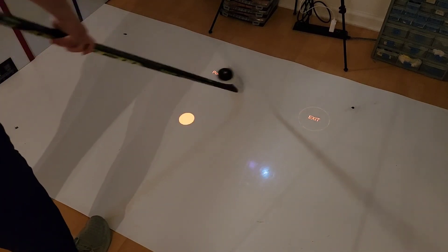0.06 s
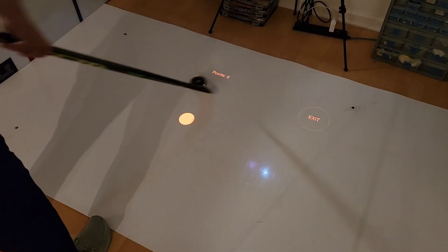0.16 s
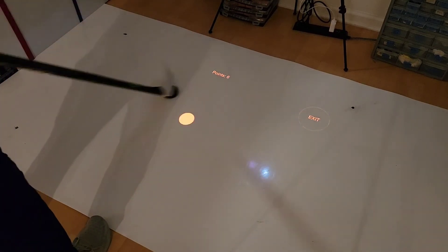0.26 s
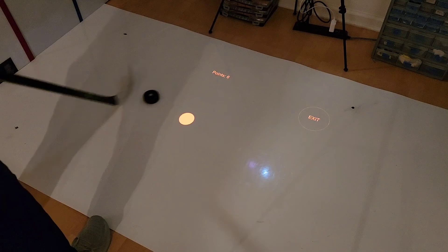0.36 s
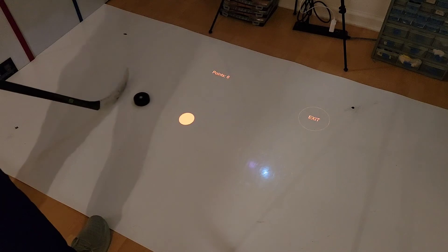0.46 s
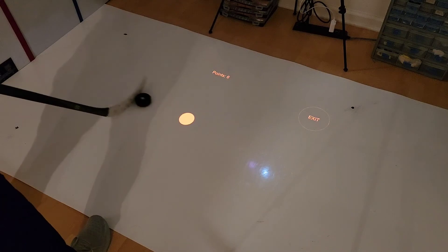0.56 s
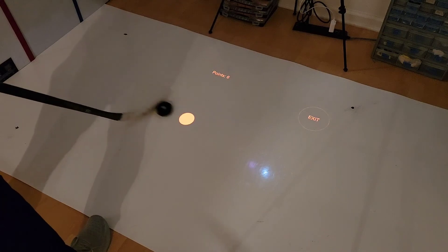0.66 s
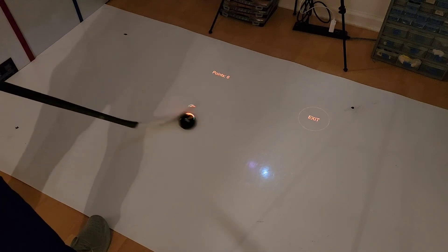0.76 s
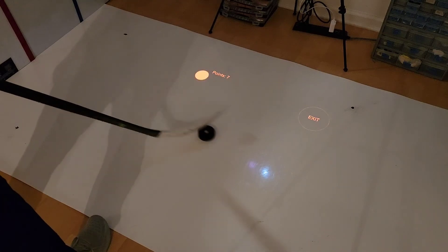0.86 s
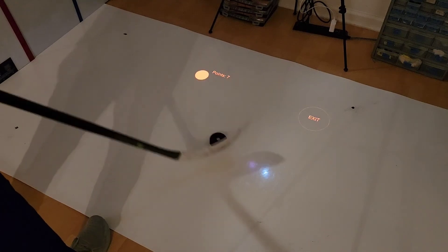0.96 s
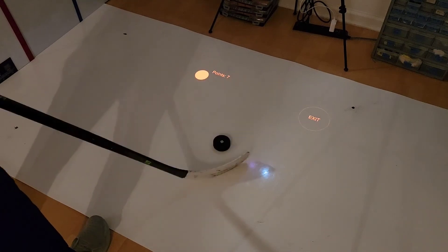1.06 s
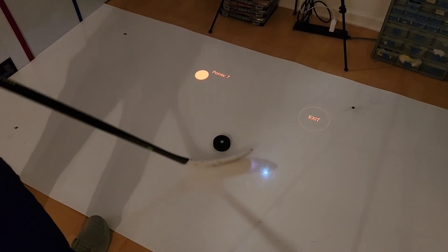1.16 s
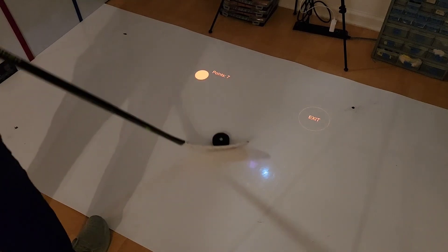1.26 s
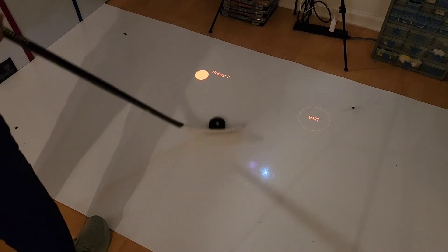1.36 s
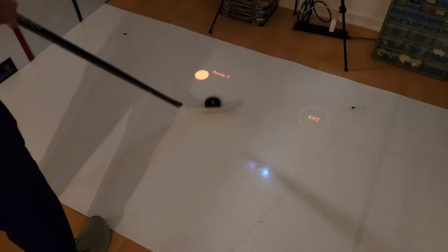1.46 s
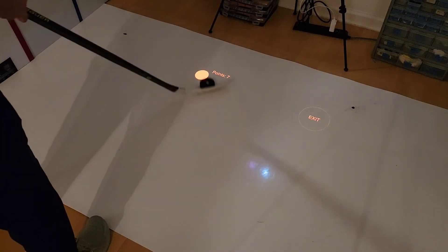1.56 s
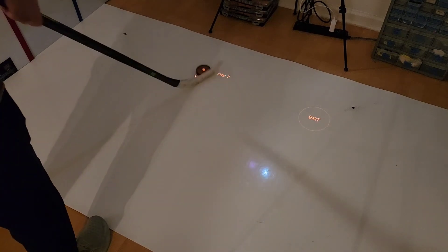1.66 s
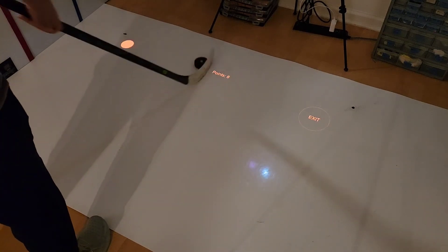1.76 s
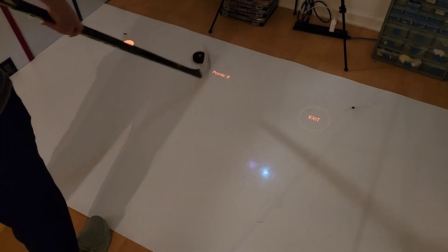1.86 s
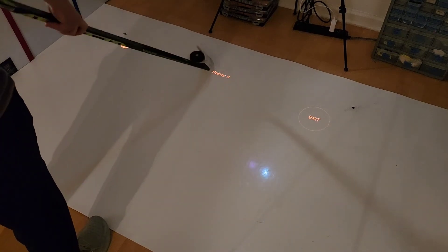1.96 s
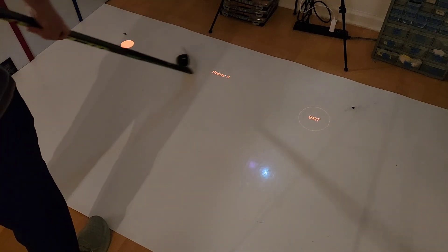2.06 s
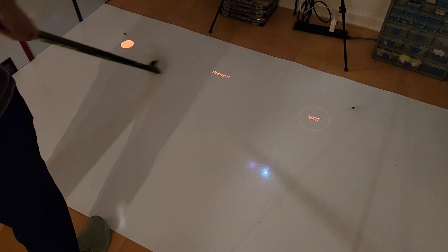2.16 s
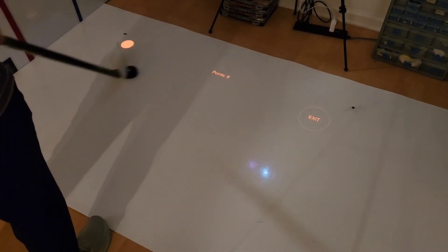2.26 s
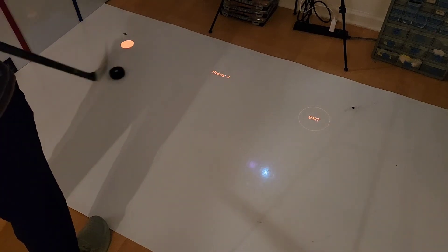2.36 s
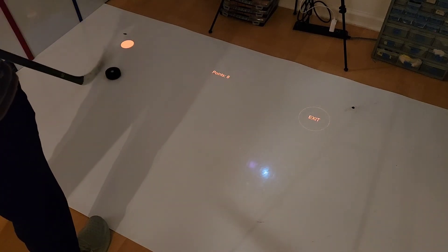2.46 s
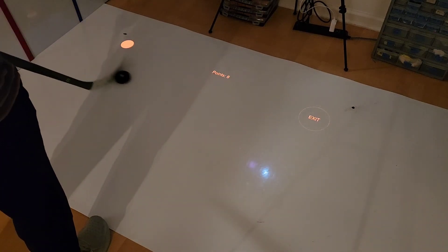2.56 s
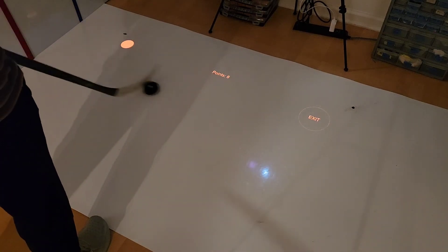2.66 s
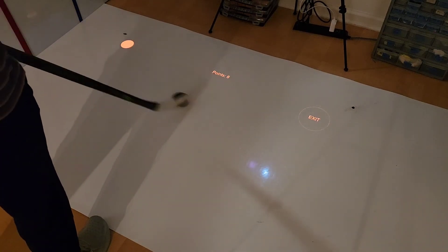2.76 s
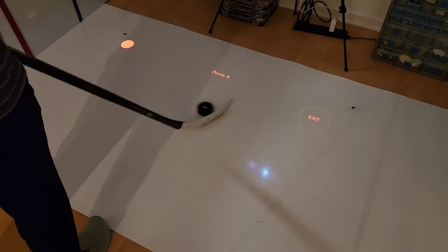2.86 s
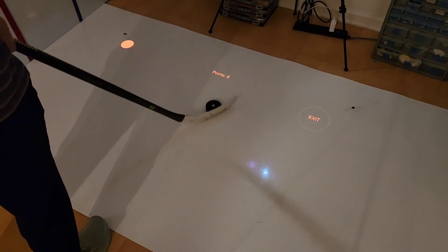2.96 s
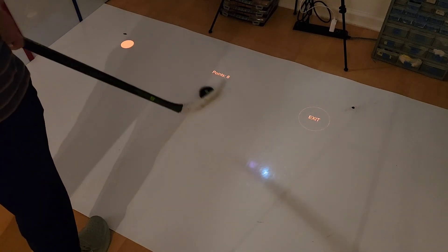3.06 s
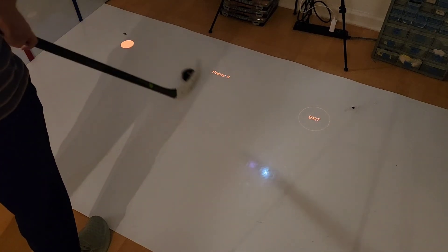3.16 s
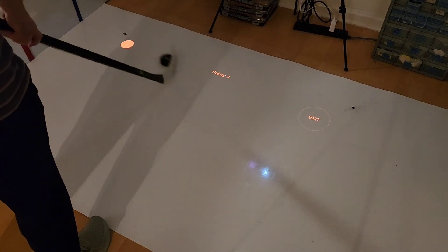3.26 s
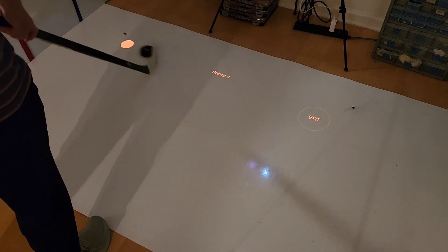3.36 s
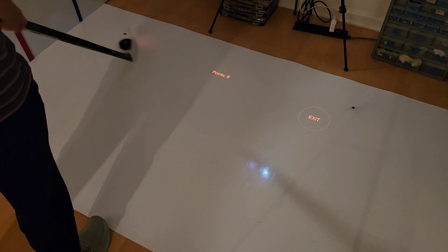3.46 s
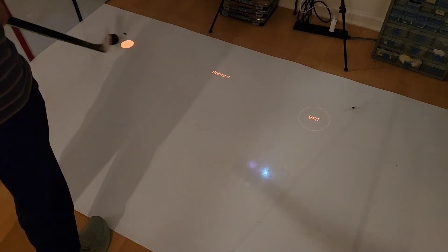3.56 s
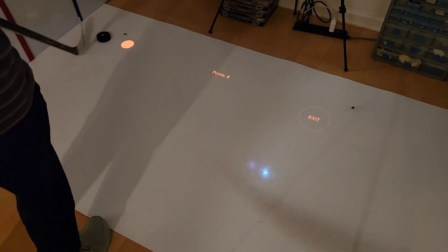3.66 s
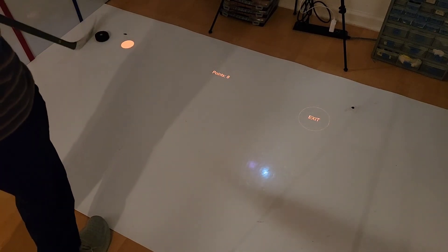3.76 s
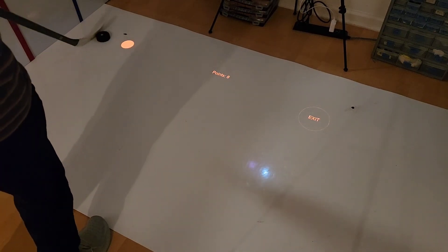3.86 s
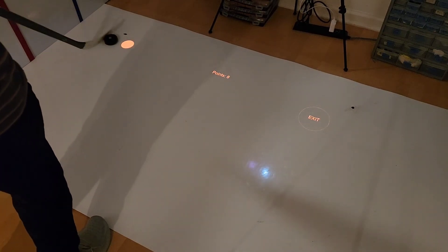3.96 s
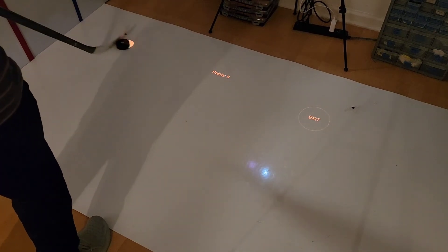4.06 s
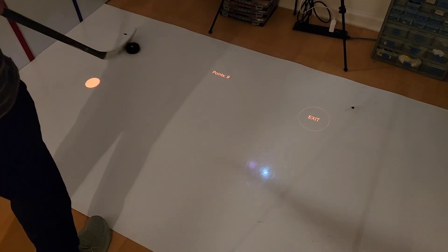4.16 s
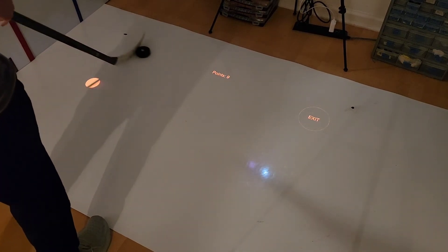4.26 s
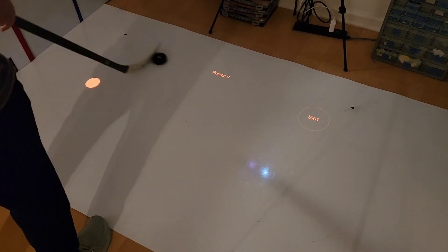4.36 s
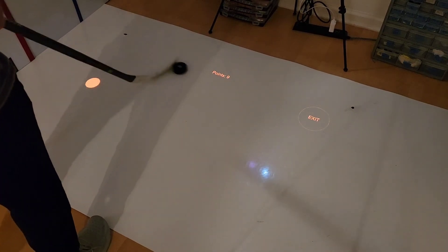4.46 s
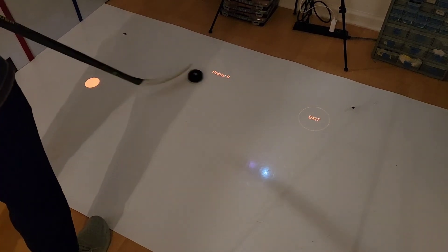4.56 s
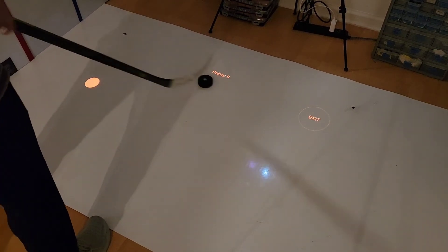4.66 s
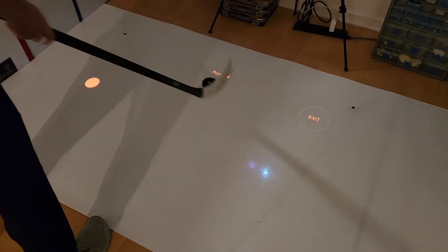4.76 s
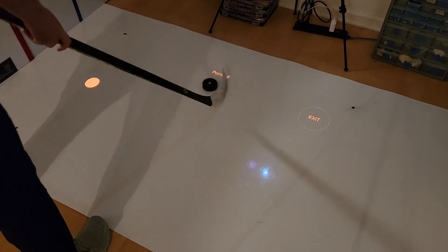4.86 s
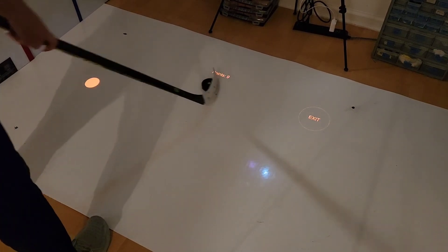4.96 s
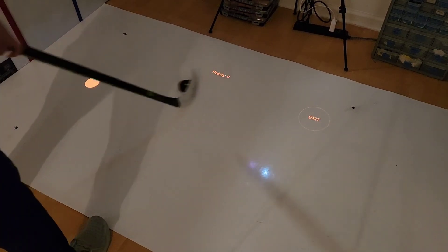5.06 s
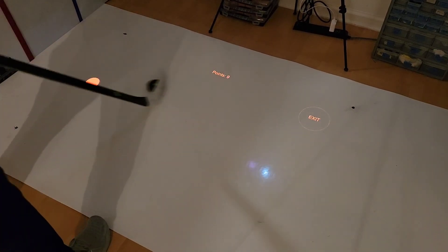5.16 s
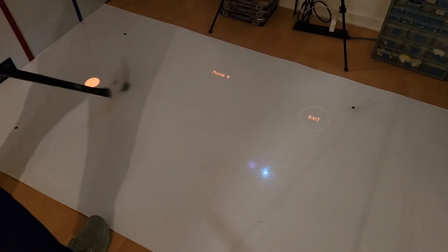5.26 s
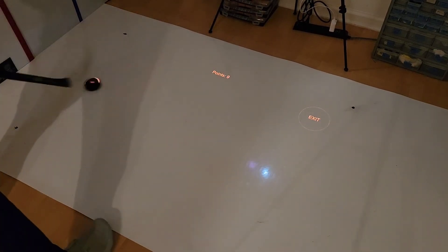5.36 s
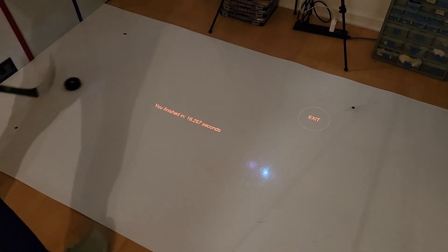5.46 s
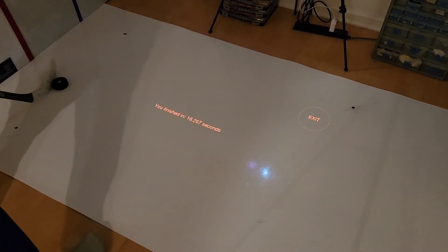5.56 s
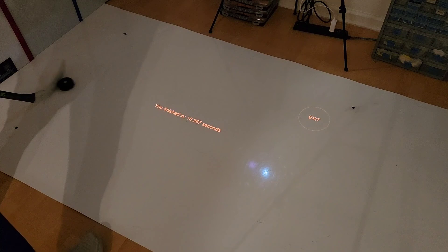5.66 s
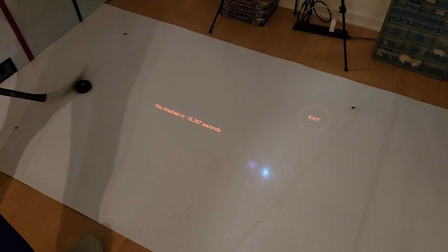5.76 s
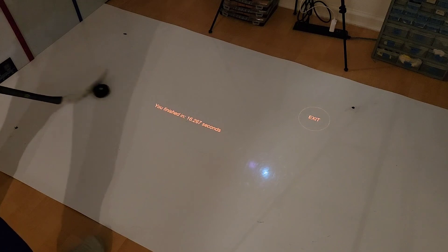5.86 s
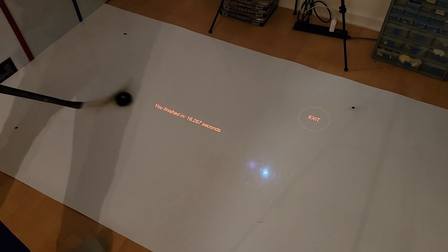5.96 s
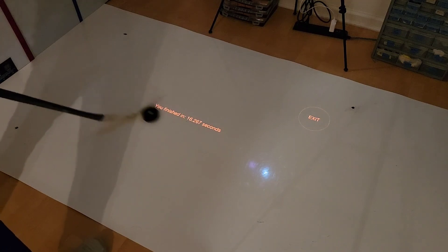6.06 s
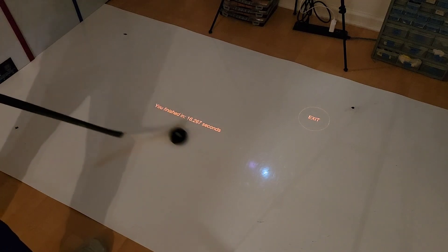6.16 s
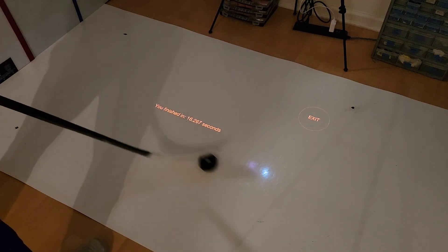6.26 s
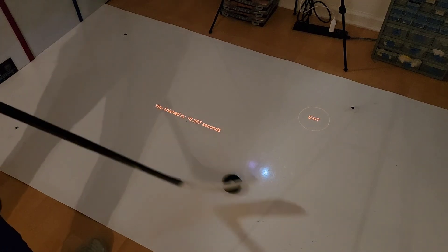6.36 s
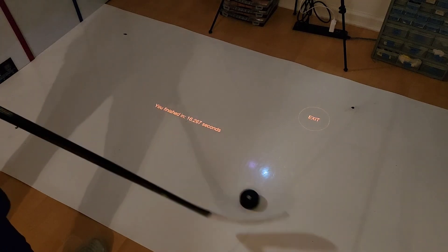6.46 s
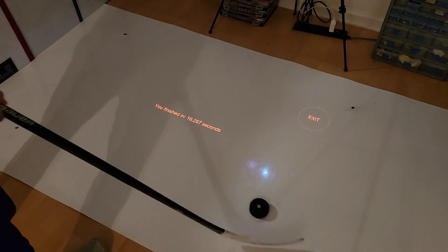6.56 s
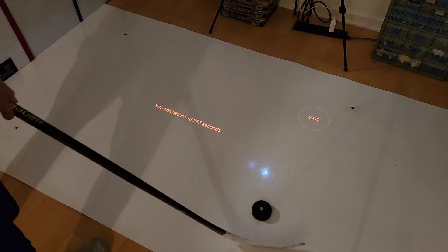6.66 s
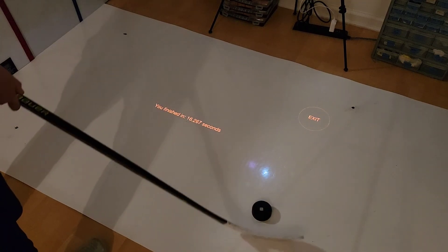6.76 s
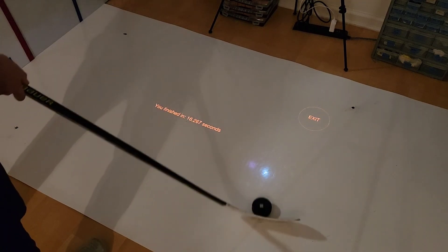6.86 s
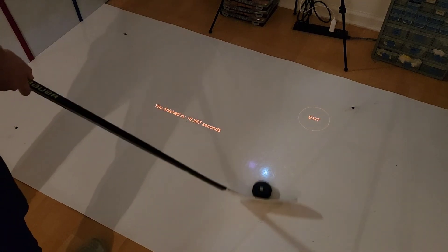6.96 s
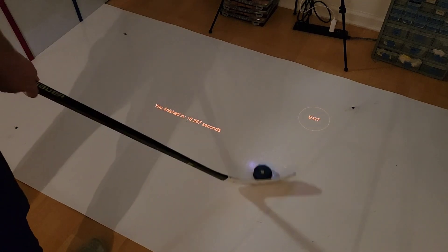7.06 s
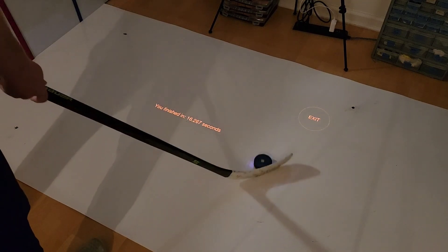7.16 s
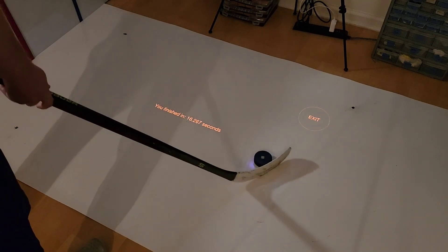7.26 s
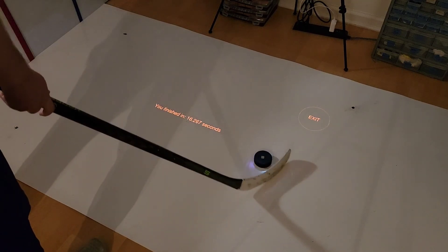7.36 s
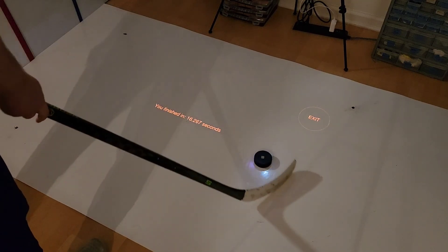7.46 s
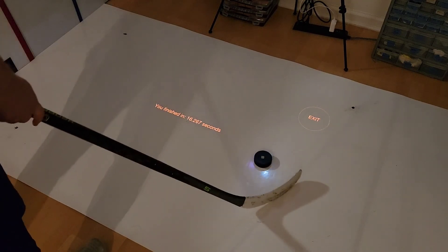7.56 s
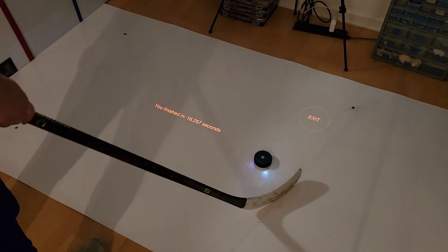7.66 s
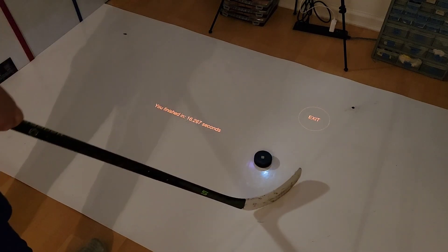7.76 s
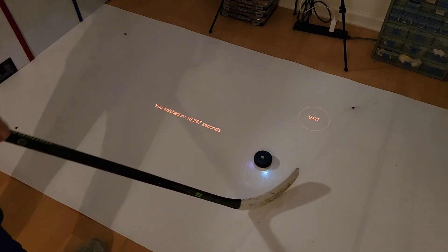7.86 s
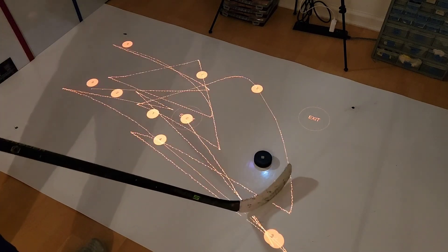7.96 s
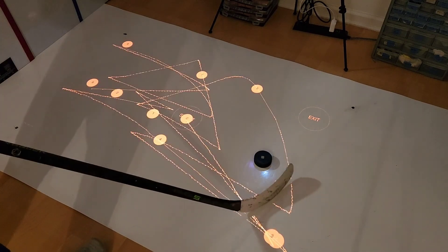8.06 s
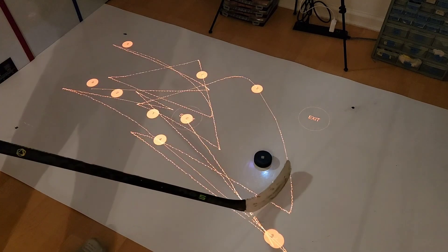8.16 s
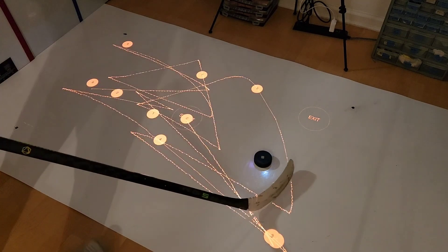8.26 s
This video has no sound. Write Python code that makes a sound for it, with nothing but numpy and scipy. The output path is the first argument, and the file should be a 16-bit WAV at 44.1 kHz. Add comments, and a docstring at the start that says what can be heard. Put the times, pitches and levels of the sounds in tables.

```python
"""Stick and puck on a slick floor

A stick blade knocks a plastic puck about on a slick floor sheet in a small hard room. Each blow is a filtered
pulse, a short knock and crack, that random room echoes draw out. Blade and puck hiss as they slide and
ventilation rumbles underneath: coloured noise, with sine fan tones. Soles or blade chirp now and then
(noise bursts through a resonance), and the floor booms (a dying low sine with a dull thump)."""
import sys
import numpy as np
from scipy import signal
from scipy.fft import rfft, irfft, next_fast_len
from scipy.io import wavfile

SR = 44100
rng = np.random.default_rng(int(sys.argv[2]) if len(sys.argv) > 2 else 0)


def makeup_ratio(level_db):
    """Linear amplitude ratio for a level in decibels (20 dB per factor of ten)."""
    decades = np.asarray(level_db, float) / 20
    return 10 ** decades


def store_pcm(level_fs):
    """Save levels as 16-bit WAV."""
    pcm = np.round(np.clip(level_fs, -1, 1) * 32767).astype(np.int16)
    wavfile.write(sys.argv[1], SR, np.atleast_2d(pcm).T)


N = 366912
TAIL = 2 ** 15   # samples in one event with its room tail


def rms_one(x):
    """Scale to unit rms."""
    return x / np.sqrt(np.mean(x ** 2) + 1e-20)


def peak_one(x):
    """Scale to unit peak."""
    return x / abs(x).max()


def at_hz(points, hz):
    """Read a spectrum table on a log-frequency axis."""
    table_hz, table_value = np.transpose(points)
    return np.interp(np.log(np.maximum(hz, 1)), np.log(table_hz), table_value)


def drift(rate_hz):
    """Slow chance: unit-spread random knots, rate_hz a second, joined by straight lines."""
    knots = rng.standard_normal(int(N / SR * 60) + 2)
    return np.interp(np.arange(N) / SR * min(rate_hz, 59), np.arange(len(knots)), knots)


def stereo(mid, side, hz):
    """Diffuse sound: the two microphones agree in the bass and part in the treble."""
    # left-right correlation: (frequency [Hz], likeness [-1..1])
    likeness = [(60, 0.95), (180, 0.95), (550, 0.58), (1650, -0.13), (4970, 0.14), (15000, -0.11)]
    alike = np.clip(at_hz(likeness, hz), -1, 1)
    return (np.sqrt(1 + alike) * mid + np.sqrt(1 - alike) * side * [[1], [-1]]) / np.sqrt(2)


def noise(spectrum, patchy_db, rate_hz):
    """Diffuse coloured noise, its two-octave-spaced bands flickering partly on their own; rms 1."""
    size = next_fast_len(N)
    hz = np.arange(size // 2 + 1) * SR / size
    whole = stereo(*rfft(rng.standard_normal((2, size))), hz) * makeup_ratio(at_hz(spectrum, hz))
    octave = np.log2(np.maximum(hz, 1) / 25)
    together = drift(rate_hz)
    out = 0
    for k in range(0, 11, 2):
        share = np.clip(1 - abs(octave - k) / 2, 0, 1)
        band = irfft(whole * share, size)[:, :N]
        out = out + band * makeup_ratio(patchy_db * (0.14 * together + drift(rate_hz)))
    return rms_one(out)


def resonance(hz, centre_hz, width_hz):
    """Power of a mode, 1 on top."""
    return 1 / (1 + ((hz ** 2 - centre_hz ** 2) / (hz * width_hz + 1e-9)) ** 2)


def sudden(power):
    """The most sudden pulse that has this power spectrum (minimum phase); peak 1."""
    fold = irfft(np.log(power + 1e-12) / 2)
    fold[1:TAIL // 2] *= 2
    fold[TAIL // 2 + 1:] = 0
    return peak_one(irfft(np.exp(rfft(fold))))


def spread(x, hz, width_hz):
    """Bending waves in the blade arrive smeared over a millisecond or two: an all-pass."""
    r, w = np.exp(-np.pi * width_hz / SR), 2 * np.pi * hz / SR
    return signal.lfilter([r * r, -2 * r * np.cos(w), 1], [1, -2 * r * np.cos(w), r * r], x)


def room(dry):
    """Fresh reflections for each source spot: lone early echoes thicken to a tail that dies band by band."""
    # reverberation time: (band centre [Hz], t60 [s])
    room_t60 = [(100, 0.64), (200, 0.39), (400, 0.39), (800, 0.43), (1600, 0.57), (3200, 0.52), (6400, 0.6),
                (12800, 0.43)]
    # colour of the room's answer: (frequency [Hz], level [dB])
    room_colour = [(100, 8), (300, 1.5), (700, 4), (1700, 5.5), (3500, 3.5), (7000, 2.5), (14000, -8)]
    grain, grain_decay_s, first_s, build_s = 0.64, 0.072, 0.00021, 0.0038
    bass_build_cycles = 0.76   # time constant of a band's swell, in cycles of its centre
    t, hz = np.arange(TAIL) / SR, np.arange(TAIL + 1) * SR / (2 * TAIL)
    sizes = np.exp(grain * np.exp(-t / grain_decay_s) * rng.standard_normal((2, TAIL)))
    build = 1 - np.exp(-np.maximum(t - first_s, 0) / build_s)
    echoes = rng.standard_normal((2, TAIL)) * sizes * build
    echoes *= 1 + 0.75 * np.exp(-t / 0.02)   # the nearest walls answer loudest
    centres = np.log(np.array(room_t60)[:, 0])
    reply = 0
    for k, (centre_hz, t60_s) in enumerate(room_t60):
        share = np.interp(np.log(hz + 1), centres, np.arange(len(centres)) == k)
        swell = 1 - np.exp(-t * centre_hz / bass_build_cycles)
        band = rfft(echoes * swell * makeup_ratio(-60 * t / t60_s), 2 * TAIL)
        reply = reply + share * band / np.sqrt(t60_s * SR / 14)   # even energy for any t60
    reply = stereo(*reply, hz) * makeup_ratio(at_hz(room_colour, hz))
    return irfft(rfft(dry, 2 * TAIL) * reply)[:, :TAIL]


def add(out, s, sound):
    """Mix a sound in at time s [s]."""
    i = round(s * SR)
    out[:, i:i + TAIL] += sound[..., :N - i]


def background():
    """Sliding hiss follows the strokes; rumble, air and fan tones run throughout."""
    # sliding strokes: (time [s], hiss level [dB rms], sizzle over hiss [dB])
    slide = [(0, -68.5, -19), (.12, -67.5, 3), (.7, -64.5, -6), (1.0, -75, 2), (1.6, -60, 1),
             (2.02, -69, -10.5), (2.2, -61, -5), (3.25, -61.5, -0.5), (3.92, -72.5, -5.5),
             (4.03, -57.5, -3.5), (4.22, -66.5, -5.5), (4.52, -58.5, -1), (4.75, -70.5, -7.5),
             (5.15, -62, -1.5), (5.7, -73, 7.5), (6.3, -63.5, 1.5), (6.7, -71, -6.5), (7.55, -62.5, -3),
             (7.72, -74.5, -5), (8.32, -73.5, -8)]
    # sliding hiss spectrum: (frequency [Hz], relative level [dB per Hz])
    hiss_colour = [(1000, -37.5), (1800, -11.5), (3000, -6), (5000, -4.5), (8500, -10.5)]
    # treble of the sliding: (frequency [Hz], relative level [dB per Hz])
    sizzle_colour = [(7000, -5), (9500, -8.5), (16000, -16)]
    # ventilation rumble spectrum: (frequency [Hz], relative level [dB per Hz])
    rumble_colour = [(20, -18.5), (38, 7.5), (54, 11.5), (70, 7.5), (97, 8.5), (129, -15.5), (150, -56.5),
                     (330, -120)]
    # rumble level: (time [s], level [dB rms])
    rumble_level = [(0, -50.5), (.45, -50), (1.4, -54), (3.3, -57.5), (8.32, -53.5)]
    # steady air spectrum: (frequency [Hz], relative level [dB per Hz])
    air_colour = [(76, -63), (130, -10.5), (268, -10), (410, -14), (829, -16.5), (16000, -57.5)]
    # fan tones: (frequency [Hz], mid level [dB rms])
    fan_tones = [(118.4, -66), (414.5, -73.5)]
    air_db = -58.5
    t = np.arange(N) / SR
    s, hiss_db, bright_db = np.transpose(slide)
    shut = [(17000, -60)]
    hiss = noise(hiss_colour + [(10000, -30)] + shut, patchy_db=1.6, rate_hz=9.0)
    sizzle = noise([(4000, -80.0)] + sizzle_colour + shut, patchy_db=-4.5, rate_hz=12.0)
    sizzle = makeup_ratio(np.interp(t, s, bright_db)) * sizzle
    sliding = makeup_ratio(np.interp(t, s, hiss_db)) * (hiss + sizzle)
    rumble = noise(rumble_colour, patchy_db=-6.0, rate_hz=6.7)
    rumble = makeup_ratio(np.interp(t, *np.transpose(rumble_level))) * rumble
    hum = 0
    for hz, db in fan_tones:
        hum = hum + makeup_ratio(db + 3.7 * drift(4.5)) * np.sqrt(2) * np.sin(2 * np.pi * hz * t)
    air = makeup_ratio(air_db) * noise(air_colour, patchy_db=2.0, rate_hz=25.0)
    return sliding + rumble + hum + air


def blows():
    """A broad knock with a woody core, a hard crack, and the modes with new strengths each time."""
    # (time [s], direct peak [dB], knock pitch [Hz], blade ring [dB], crack before trim [dB],
    #  crack brightness [dB per octave], room [dB])
    blow_table = [(0.4557, -9, 682, -1.5, -12.5, -4.5, 1), (0.459, -9, 1150, -1, 1, -4, -3),
                  (0.61, -6, 728, 7.5, -4.5, 3, -2), (1.1319, -9.5, 535, 12, -6, -1.5, -5),
                  (1.312, -11, 620, 9, -10.5, -0.6, -2.5), (2.337, -30.5, 486, -6.5, -16, -3, -0.5),
                  (2.44, -35, 478, -4, -20, -5, 4), (2.471, -16, 575, -3.5, -18.5, -3, -0.5),
                  (2.5758, -12.5, 602, 8.5, -14, 3, -1.5), (2.924, -8, 950, 7, -8.5, 3.5, -5),
                  (2.9661, -6.5, 924, 5, -4.5, 1.5, -2), (3.743, -9, 630, 7, -9, -1, 0.5),
                  (4.9343, -1.5, 612, -1, -3.5, -0.5, 0.5), (5.033, -24.5, 616, 7, -34, -6, 3),
                  (5.566, -18.5, 600, 1.5, -13.5, -0.5, 0.5), (5.63, -15.5, 555, 4, -14.5, 1, -3),
                  (6.722, -24.5, 1225, 2, -47, -7, -9), (6.906, -16, 802, 2, -13, 0, -0.5)]
    # blade and sheet modes: (frequency [Hz], mean level [dB], ring [s], where width [Hz] = 3.03 / ring)
    blade_modes = [(216.4, -1.5, 0.051), (333.5, -4, 0.15), (434, -4, 0.012), (650, -1, 0.28),
                   (973, -7.5, 0.012)]
    # upper modes of blade and puck, struck by the crack: (frequency [Hz], width [Hz])
    upper_modes = [(1160, 150), (1340, 44), (1780, 13), (2220, 360), (2720, 23), (3400, 430), (4700, 100)]
    # hard edge of a contact: (frequency [Hz], level [dB])
    crack_colour = [(650, -18), (1150, 3.5), (2000, 1.5), (4000, 3.5), (5500, 0.5), (8000, -3),
                    (14000, -11.5)]
    # straight path against room sound: (frequency [Hz], level [dB])
    toward_microphone = [(130, -23.5), (300, 2.5), (1300, 11), (2500, 9), (4800, 12.5), (7000, 2.5),
                         (12000, -13.5)]
    lead_s, lag_s, second_s = 0.0004, 0.00011, 0.0009
    contact_cut = 2.07   # a contact stirs the modes up to this multiple of its knock pitch
    # the crack steps down above a pitch that sinks for softer blows
    edge_hz, edge_db_per_octave, edge_step_db = 4300, 18, -8
    crack_trim_db = -6.5
    out, t = np.zeros((2, N)), np.arange(TAIL) / SR
    hz = np.arange(TAIL // 2 + 1) * SR / TAIL
    for s, peak_db, knock_hz, ring_db, crack_db, bright_db, room_db in blow_table:
        knock = resonance(hz, knock_hz, 1.37 * knock_hz) ** 6.6
        core = makeup_ratio(11.5) * resonance(hz, 1.049 * knock_hz, 0.085 * knock_hz) ** 2.2

        modes = 0
        for mode_hz, db, ring_s in blade_modes:
            modes = modes + makeup_ratio(db + rng.normal(0, 2.7)) ** 2 * resonance(hz, mode_hz, 3.03 / ring_s)
        modes = modes / (1 + (hz / (contact_cut * knock_hz)) ** 4)

        ringing = 1
        for mode_hz, width_hz in upper_modes:
            ringing = ringing + makeup_ratio(rng.normal(1, 3)) ** 2 * resonance(hz, mode_hz, width_hz)
        edge_db = at_hz(crack_colour, hz) + bright_db * np.log2(np.maximum(hz, 1000) / 3000)
        step_hz = edge_hz * 2 ** (peak_db / edge_db_per_octave)
        below = 1 / (1 + (hz / step_hz) ** 12)
        edge_db = edge_db + edge_step_db * (1 - below)
        crack = ringing * makeup_ratio(crack_db + crack_trim_db + edge_db) ** 2

        power = knock + core + makeup_ratio(ring_db) ** 2 * modes + crack
        near = sudden(power * makeup_ratio(at_hz(toward_microphone, hz)) ** 2)
        near = spread(spread(near, 2660, 1200), 2200, 1192)
        # a light touch of opposite sign, then the full blow
        near = np.interp(t - second_s, t, near, left=0) - 0.082 * near
        # the left microphone is nearer
        direct = np.array([near, np.interp(t - lag_s, t, near, left=0)])
        late = np.roll(sudden(power), round(second_s * SR))
        sound = peak_one(direct) + makeup_ratio(room_db) * room(late)
        add(out, s - second_s - lead_s, makeup_ratio(peak_db) * sound)
    return out


def chirps():
    """Rubber or tape catches on the sheet: broad catches tick, narrow squeaks swell in; slips are uneven."""
    # chirps and pings: (time [s], direct peak [dB], centre [Hz], width [Hz], decay [s])
    chirp_table = [(0.4546, -35.5, 4680, 323, 0.0015), (0.83, -58.5, 6340, 300, 0.012),
                   (1.712, -52.5, 3100, 1100, 0.02), (1.82, -47, 2600, 4000, 0.018),
                   (2.186, -39, 8100, 6200, 0.03), (2.204, -47, 524, 370, 0.0067),
                   (2.248, -41.5, 5270, 785, 0.015), (2.62, -47, 4300, 600, 0.0052),
                   (2.705, -46.5, 8400, 1560, 0.012), (3.406, -46.5, 4100, 1270, 0.016),
                   (3.411, -55, 7740, 1000, 0.016), (3.499, -46.5, 4340, 2580, 0.014),
                   (4.447, -52.5, 8800, 920, 0.031), (5.348, -43, 6060, 2060, 0.0056),
                   (5.749, -50, 4000, 1820, 0.01), (5.886, -37, 6550, 6900, 0.003),
                   (6.22, -36.5, 8100, 9000, 0.023), (7.356, -58, 2700, 1500, 0.09)]
    room_db, steep, swell = 4.5, 0.84, 0.55
    out, t = np.zeros((2, N)), np.arange(TAIL) / SR
    hz = np.arange(TAIL // 2 + 1) * SR / TAIL
    for s, peak_db, centre_hz, width_hz, decay_s in chirp_table:
        broad = min(width_hz / centre_hz, 1)
        rise = 1 - np.exp(-t / (swell * decay_s * (1 - broad) + 1e-4))
        tick = 2.3 * broad ** 2 * np.exp(-t / 0.00094)
        uneven = rng.standard_normal(TAIL) * np.exp(0.8 * rng.standard_normal(TAIL))
        slips = uneven * (rise * np.exp(-t / decay_s) + tick)
        voice = sudden(resonance(hz, centre_hz, width_hz) ** (2 * steep))
        dry = makeup_ratio(peak_db) * peak_one(irfft(rfft(slips) * rfft(voice)))
        add(out, s, dry + makeup_ratio(room_db) * room(dry))
    return out


def boom():
    """The floor's lowest mode swells and dies, its pitch a little different each time; peak about 1."""
    boom_hz, t60_s, rise_s = 93.5, 0.23, 0.013
    t = np.arange(TAIL) / SR
    swell = (1 - np.exp(-t / rise_s)) ** 2 * makeup_ratio(-60 * t / t60_s)
    return swell / swell.max() * np.sin(2 * np.pi * boom_hz * (1 + rng.normal(0, 0.0081)) * t)


def steps():
    """Some blows, where the blade lands on the floor, and footfalls make it boom, with a low-passed noise thump."""
    # floor booms: (time [s], boom peak [dB])
    boom_table = [(0.459, -33.5), (2.336, -34), (2.472, -36.5), (2.575, -40.5), (2.961, -36.5),
                  (3.742, -33), (5.28, -40.5), (5.564, -38.5), (6.907, -44.5)]
    thump_decay_s, thump_db = 0.031, -4.0
    out = np.zeros((2, N))
    dull = signal.butter(2, 350, fs=SR, output="sos")
    fade = np.exp(-np.arange(TAIL) / SR / thump_decay_s)
    for s, db in boom_table:
        thump = signal.sosfilt(dull, rng.standard_normal(TAIL) * fade)
        add(out, s, makeup_ratio(db) * (boom() + makeup_ratio(thump_db) * room(peak_one(thump))))
    return out


def scene():
    """All sources in the room."""
    return background() + blows() + chirps() + steps()


def roll_off(x):
    """The treble ends steeply here."""
    return signal.sosfilt(signal.butter(12, 16490, fs=SR, output="sos"), x)


def record(dry):
    """Microphone colour, the left one a little more sensitive."""
    # microphone response: (frequency [Hz], level [dB])
    microphone = [(3000, 3), (6000, 0), (8500, 1.5), (9700, -5), (11500, 2), (15000, 3.5), (15900, 0.5),
                  (16200, -61)]
    # sensitivity of left over right: (frequency [Hz], level [dB])
    left_over_right = [(60, 1.5), (550, 3), (4970, 3.5), (15000, 2.5)]
    size = next_fast_len(N)
    hz = np.arange(size // 2 + 1) * SR / size
    colour_db = at_hz(microphone, hz) + at_hz(left_over_right, hz) / 2 * [[1], [-1]]
    mix = irfft(rfft(dry, size) * makeup_ratio(colour_db), size)[:, :N]
    return roll_off(mix)


dry = scene()
out = record(dry)
store_pcm(out)
```